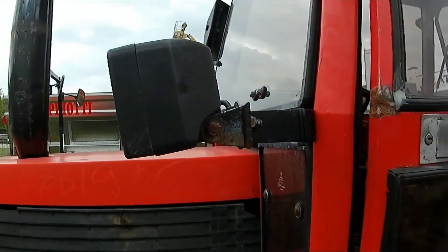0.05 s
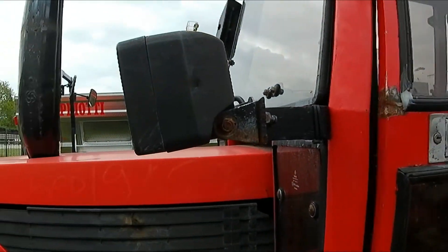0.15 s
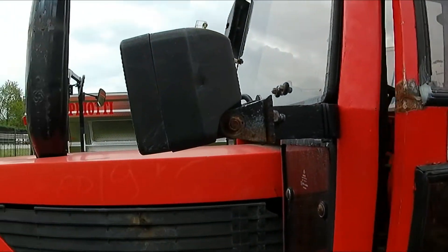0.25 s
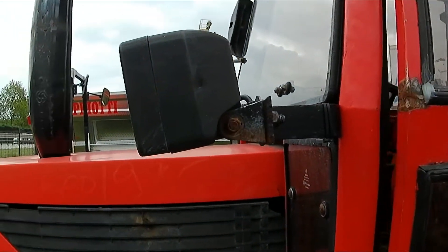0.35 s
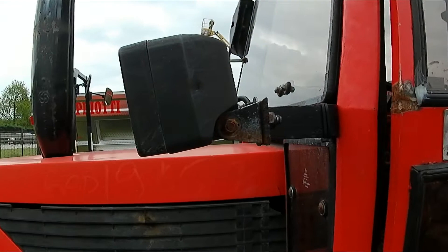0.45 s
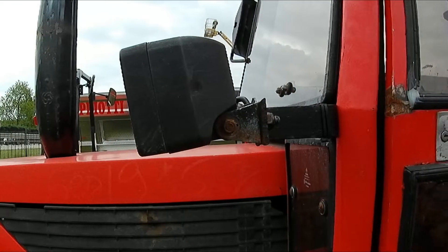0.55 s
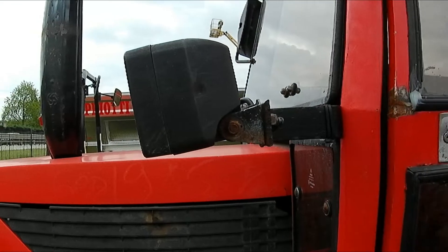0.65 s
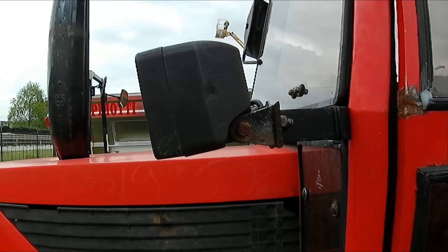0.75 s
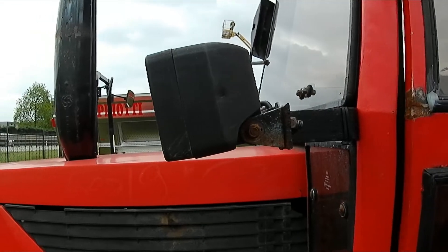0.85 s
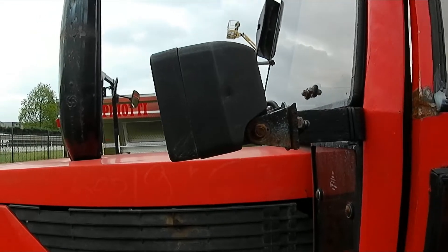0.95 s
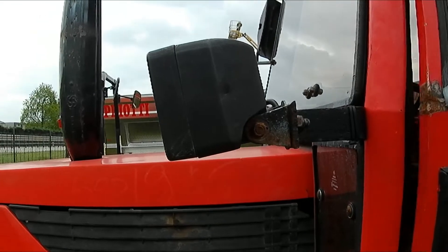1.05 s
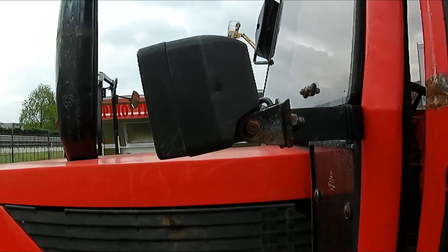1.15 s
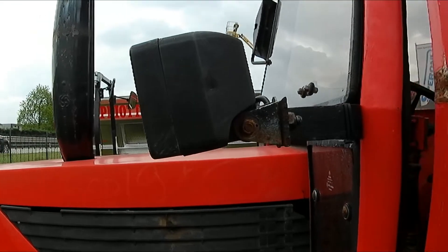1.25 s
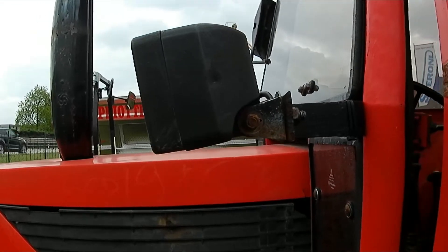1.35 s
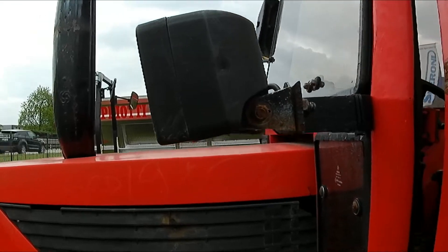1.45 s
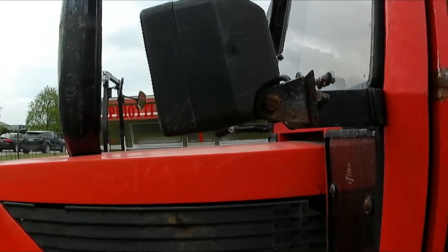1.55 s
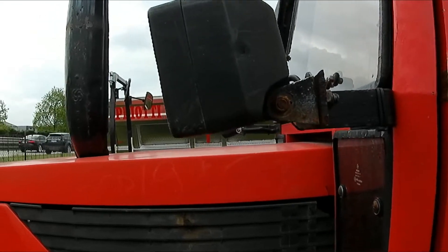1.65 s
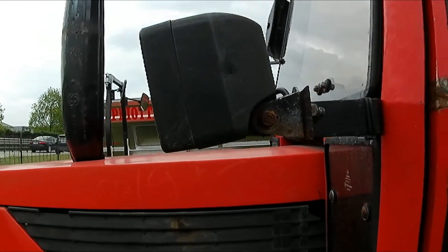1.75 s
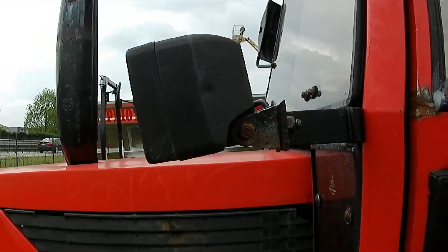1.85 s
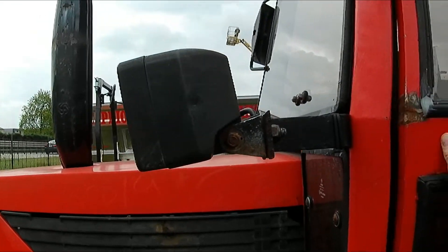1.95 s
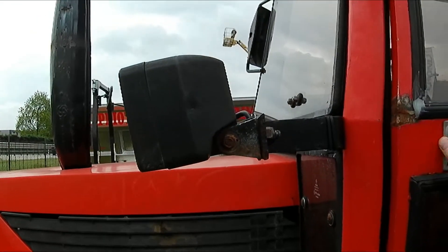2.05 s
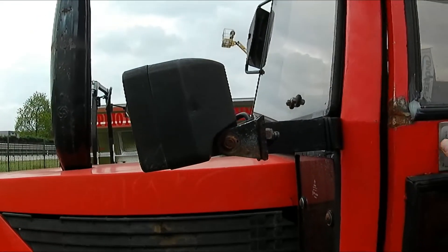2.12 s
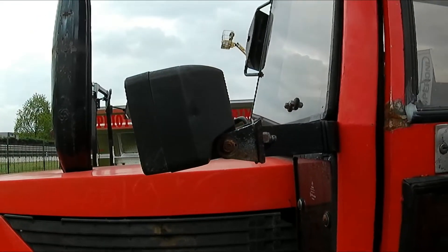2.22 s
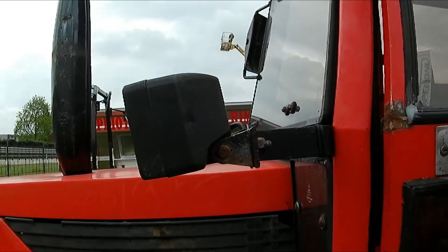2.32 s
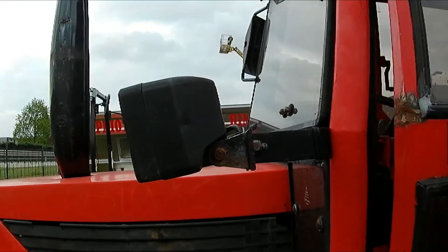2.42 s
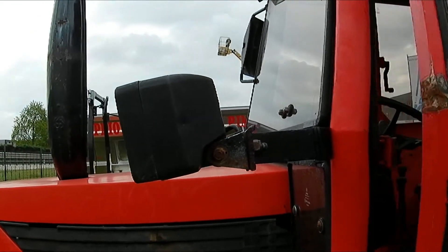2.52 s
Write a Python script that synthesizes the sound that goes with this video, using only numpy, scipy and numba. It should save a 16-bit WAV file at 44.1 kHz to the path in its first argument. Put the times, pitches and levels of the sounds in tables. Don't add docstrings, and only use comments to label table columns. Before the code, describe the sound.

Two heavy metal cab door slams with latch clatter, close up, above distant tyre roar and engines

```python
import sys
import numpy as np
from scipy import signal
from scipy.io import wavfile
from scipy.ndimage import uniform_filter1d
from numba import njit

SR = 44100
rng = np.random.default_rng(int(sys.argv[2]) if len(sys.argv) > 2 else 0)


def boost(x):
    u = np.asarray(x, float) / 20
    return 10 ** u


def store_wav(level_fs):
    pcm = np.round(np.clip(np.atleast_2d(level_fs), -1, 1) * 32767)
    wavfile.write(sys.argv[1], SR, pcm.T.astype(np.int16))


N = 114660


def level(x, db):
    return boost(db) * x / np.sqrt(np.mean(x ** 2))


@njit
def moving_band(x, hz, share):
    y, band_state, low_state = np.empty(len(x)), 0., 0.
    for i in range(len(x)):
        g = np.tan(np.pi * hz[i] / SR)
        v = (band_state + g * (x[i] - low_state)) / (1 + g * (g + share))
        band_state = 2 * v - band_state
        low_state = low_state + 2 * g * v
        y[i] = share * v
    return y


def band(x, hz, share):
    return moving_band(x, np.full(len(x), min(1. * hz, .44 * SR)), 1. * share)


def noise_band(hz, first_share, second_share):
    return band(band(rng.standard_normal(N), hz, first_share), hz, second_share)


def walk(rate):
    k = int(SR / rate)
    steps = np.repeat(rng.standard_normal(N // k + 1), k)
    return level(uniform_filter1d(uniform_filter1d(steps, k), k)[:N], 0)


def curve(table, col):
    return np.interp(np.arange(N) / SR, np.array(table)[:, 0], np.array(table)[:, col])


def opening_step():
    return .047 * np.exp(-np.arange(N) / (.001 * SR))


# (t/s, level/dB, roar centre f/Hz, edge near 1.7 kHz level/dB,
# top above 2.5 kHz level/dB)
ROAD_SHADING = [(0, -33.5, 1030, 6.5, 4.5), (.09, -33.5, 1027, 0.5, 8), (.3, -40, 800, 1.5, 10.5),
                (.5, -39, 880, -2, 7), (.65, -41.5, 740, 4, 5), (.85, -40.5, 783, 5, 9.5),
                (1.05, -38, 670, 0, 2), (1.25, -38, 674, -4, -6), (1.4, -42, 830, 9.5, -27),
                (1.52, -41.5, 840, 7.5, 13.5), (1.75, -47, 850, 14.5, 13), (1.9, -44.5, 920, 4, 12),
                (2.2, -44, 1090, 3.5, 10), (2.6, -45, 980, 5, 12)]
# (f/Hz, level per Hz/dB)
ROAD_COLOUR = [(180, -36), (300, -0.5), (428, 1.5), (628, 2.5), (896, 1), (969, 1.5), (1780, -8),
               (2050, -15), (7000, -61), (9100, -80), (15400, -120)]


def road():
    hiss, colour = 0, np.array(ROAD_COLOUR)
    edge_db, top_db = curve(ROAD_SHADING, 3), curve(ROAD_SHADING, 4)
    for hz in 300 * 2 ** np.arange(0, 4.7, 1 / 4):
        db = np.interp(np.log(hz), np.log(colour[:, 0]), colour[:, 1])
        db = db + 10 * np.log10(hz)
        db = db + .8 * walk(18)
        db = db + edge_db * np.exp(-(np.log2(hz / 1700) / .4) ** 2)
        db = db + top_db * np.clip(np.log2(hz / 2000) * 2, 0, 1)
        hiss = hiss + level(noise_band(hz, .32, .32), db)
    roar_hz, roar_width = curve(ROAD_SHADING, 2), .35
    roar = moving_band(rng.standard_normal(N), roar_hz, roar_width)
    roar = moving_band(roar, roar_hz, roar_width)
    return level(hiss, 0) + level(roar, -4)


# (delay t/ms, level/dB)
MIRRORS = [
    (8.2, -22.5),
    (16.9, -1),
    (27, -6.5),
]


def mirrored_road():
    direct, i = road(), np.arange(N)
    total = direct
    for ms, db in MIRRORS:
        delay = ms * SR / 1000 * (1 + .0095 * walk(2.125))
        total = total + boost(db) * np.interp(i - delay, i, direct)
    return level(total, 0) * boost(curve(ROAD_SHADING, 1))


# (t/s, level/dB, upper drone against the lower level/dB)
RUMBLE = [
    (0, -33, -4),
    (.3, -32, -21),
    (.46, -38.5, -5.5),
    (.9, -37, -3.5),
    (1.2, -35, 1.5),
    (1.4, -39.5, 5.5),
    (1.7, -28, -5),
    (1.95, -41.5, -2.5),
    (2.6, -40, -10.5),
]
# (f/Hz, width f/Hz, level/dB)
RUMBLE_PEAKS = [(48, 9.7, -2.5), (60.5, 10.6, -0.5), (108.8, 24.5, -1.5), (177.4, 7.1, -7),
                (233, 32, -10.5), (282.6, 16.2, -12.5)]


def rumble():
    total, drone_db = 0, curve(RUMBLE, 2)
    for hz, width, db in RUMBLE_PEAKS:
        tone = level(noise_band(hz, width / hz, 2 * width / hz), db)
        total = total + tone * boost(walk(8.28) / 2 + (hz > 150) * drone_db)
    return level(total, 0) * boost(curve(RUMBLE, 1))


# (t/s, level/dB)
HISS = [
    (0, -70),
    (.5, -73),
    (1.5, -76),
    (1.9, -78),
    (2.6, -77),
]


def microphone_hiss():
    return level(band(rng.standard_normal(N), 5900, 4.7), curve(HISS, 1))


# (t/s, level/dB, push length t/ms, direction +-1)
SEAL_BLOWS = [(0.1075, -16.8, 4.8, -1), (0.1169, -21, 1.4, 1), (0.1234, -21.5, 1.4, 1), (0.13, -21, 1.4, 1),
              (0.1395, -5.2, 8.1, 1), (0.1483, -18.5, 1.4, -1), (0.1598, -21.5, 2.9, 1),
              (0.1641, -23.5, 4.8, -1), (0.1808, -25, 1.4, -1), (0.21, -35, 1.4, -1), (0.236, -27, 6.5, 1),
              (1.5419, -11.8, 15, -1), (1.5547, -13.4, 12.2, 1), (1.5694, -23.6, 1.4, 1),
              (1.5784, -9.1, 8.7, 1), (1.5889, -10.2, 15, -1), (1.5996, -14.7, 4.6, 1),
              (1.6038, -23, 1.4, -1), (1.611, -8.9, 8.1, -1), (1.616, -17.3, 3.4, 1), (1.6213, -28, 1.4, 1),
              (1.6334, -23, 5.9, -1), (1.6387, -16, 4.8, 1), (1.6565, -29, 1.4, -1),
              (1.7223, -24.5, 5.1, 1)]
# (f/Hz, level/dB, time to fall 60 dB t/s)
SHELL_TONES = [(47, -20, .05), (61.1, -.9, .18), (78.4, -11.5, .2), (116.2, -14.9, .44), (126.4, -8.2, .3),
               (177.6, -1.9, .12), (223.8, -6, .23), (299, -10, .17), (511, -15, .15)]


def shell(ticks):
    t, force = np.arange(N) / SR, boost(-48.5) * ticks / 20
    for s, db, ms, sign in SEAL_BLOWS:
        push = np.sin(np.pi * np.clip((t - s) * 1000 / ms, 0, 1))
        force = force + sign * boost(db) * push / (ms * SR / 1600)
    boom = 0
    for hz, db, t60 in SHELL_TONES:
        pole = np.exp(2j * np.pi * hz / SR - np.log(1000) / (t60 * SR))
        boom = boom + boost(db) * signal.lfilter([1], [1, -pole], force.astype(complex)).imag
    return boom


# (end t/s, length t/ms, door-skin knock level/dB,
# latch clink level/dB, bright splash level/dB)
CHATTER = [(0.1113, 2.5, -34, -41, -43), (0.117, 5, -35, -42, -52), (0.1255, 7, -34, -45, -52),
           (0.1284, 2.4, -30, -27, -29), (0.1328, 3, -25, -30, -38), (0.136, 3, -24, -32, -38),
           (0.1415, 5, -29, -39, -46), (0.15, 8, -29, -42, -50), (0.1555, 5, -33, -40, -47),
           (0.1595, 3, -33, -38, -42), (0.166, 6, -35, -39, -52), (1.551, 3, -32, -43, -41),
           (1.5587, 5.5, -30, -37, -47), (1.5655, 5, -33, -36, -46), (1.568, 2, -23, -27, -26),
           (1.5728, 2.8, -24, -25, -31), (1.5757, 2.8, -25, -26, -35), (1.5797, 2, -31, -34, -45),
           (1.5875, 4.5, -36, -40, -50), (1.5915, 3, -32, -37, -48), (1.604, 6.5, -32, -33, -46),
           (1.61, 5.5, -32, -40, -53), (1.616, 3, -40, -46, -56)]
# (f/Hz, width f/Hz, level/dB)
DOOR_SKIN = [(300, 60, 1), (410, 32, 0), (511, 32, 8), (630, 100, 2), (760, 90, 1), (920, 140, -1),
             (1220, 200, 2), (1550, 300, -7)]
LATCH = [(2000, 500, 0), (2500, 600, 1), (3000, 700, -1)]
SPLASH = [(3600, 600, 10), (4300, 600, 9), (5400, 700, 0), (9300, 1500, -7), (12500, 4000, -20)]
# trim (level/dB), brightest contact (f/Hz),
# and how fast the seal grips the ring once contact ends (t/ms)
TRIM_DB = (0, -1, 0)
CONTACT_TOP_HZ = (1900, 3500, 13500)
CHOKE_MS = (4, .5, .4)


def chatter():
    out, u = np.zeros(N), np.arange(4096)
    for end, ms, *levels in CHATTER:
        n = int(ms * SR / 1000)
        start = int(end * SR) - n
        gate = np.clip(u / n, 0, 1) ** .7 * np.clip((n - u) / 6, 0, 1)
        parts = zip((DOOR_SKIN, LATCH, SPLASH), levels, TRIM_DB, CONTACT_TOP_HZ, CHOKE_MS)
        for body, db, trim, top, choke in parts:
            grit = rng.standard_normal(512)
            contacts = np.resize(grit * np.abs(grit), 4096) * gate
            push = signal.sosfilt(signal.butter(4, top, fs=SR, output="sos"), contacts)
            ring = sum(boost(g) * band(push, hz, w / hz) * np.sqrt(hz / w) for hz, w, g in body)
            ring = ring * np.exp(-np.maximum(u - n, 0) * 1000 / (choke * SR))
            out[start:start + 4096] += ring * boost(db + trim) / np.sqrt(np.mean(ring[:n + 10] ** 2))
    return out


def yard(x):
    t = np.arange(SR) / SR
    tail = band(rng.standard_normal(SR), 2660, .43) * boost(-60 * t) * np.clip(t / .0073, 0, 1)
    return signal.fftconvolve(x, tail / np.sqrt(np.sum(tail ** 2)))[:N] * boost(-35.5)


# (t/s, peak level/dB, contact t/ms, direction +-1)
KNOCKS = [(0.1313, -12.5, .5, 1), (0.1333, -13, .7, -1), (0.1344, -10, .6, -1), (0.1395, -16, .8, -1),
          (0.144, -13, .9, -1), (0.1467, -17, .9, -1), (0.1504, -18, .9, -1), (1.5545, -19, .6, -1),
          (1.556, -15, .7, -1), (1.5613, -17, .9, -1), (1.5714, -6, .35, 1), (1.5735, -4, .55, -1),
          (1.575, -10, .5, -1), (1.5787, -13, .7, -1), (1.5904, -17, .9, -1), (1.606, -17, 1, -1),
          (1.622, -16, 1.2, -1), (1.64, -20, 1.2, -1), (2.297, -44, .2, 1)]


def knocks():
    t, push = np.arange(N) / SR, 0
    for s, db, ms, sign in KNOCKS:
        v = np.clip((t - s) * 3000 / ms, -9, 9)
        push = push + sign * boost(db) * (1 - v ** 2 / 2) * np.exp(-v ** 2 / 2)
    return .9 * push + boost(-4) * band(push, 1200, .35)


# (start t/s, level/dB, time to fall 60 dB t/s)
SHUDDER = [
    (0.137, -27, 0.69),
    (1.575, -22.5, 0.4),
]
# (f/Hz, level/dB)
SHUDDER_BANDS = [(62, -2), (115, -2), (180, -9), (300, -5.5), (450, -6), (600, -9.5), (1000, -8),
                 (2200, -19), (4000, -33), (8000, -36.5)]


def shudder():
    t, fade, shake = np.arange(N) / SR, 0, 0
    for s, db, t60 in SHUDDER:
        rise = np.clip((t - s) / .026, 0, 1)
        fade = fade + rise * boost(db - 60 * np.maximum(t - s, 0) / t60)
    for hz, db in SHUDDER_BANDS:
        shake = shake + level(noise_band(hz, .5, .8), db) * boost(1.5 * walk(30))
    return fade * shake


def scene():
    background = opening_step() + mirrored_road() + rumble()
    ticks, hits = chatter(), knocks()
    door = shell(ticks) + ticks + hits + shudder()
    return (background + door + yard(ticks + hits))[None]


def low_pass(x):
    return signal.sosfilt(signal.butter(12, 15830, fs=SR, output="sos"), x)


def record(dry):
    clip_top, offset = 1.6, .0062
    x = clip_top * np.tanh((dry + microphone_hiss()) / clip_top) + offset
    cut = signal.ellip(12, .3, 75, 15720, fs=SR, output="sos")
    first = x[:, :1]
    return low_pass(signal.sosfilt(cut, x - first) + first)


dry = scene()
out = record(dry)
store_wav(out)
```